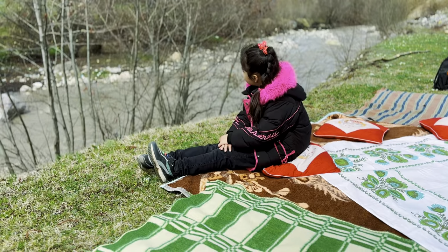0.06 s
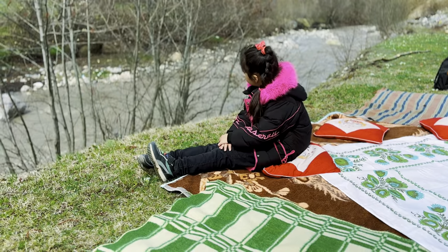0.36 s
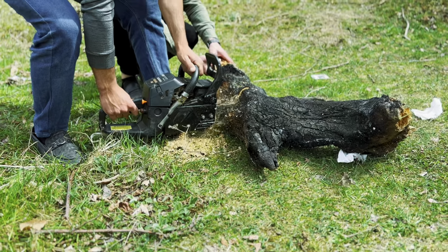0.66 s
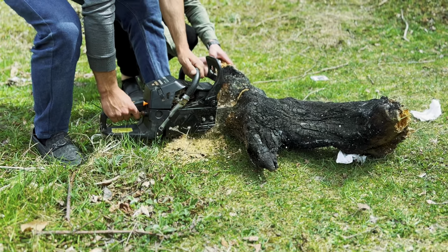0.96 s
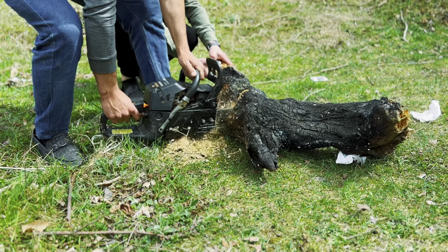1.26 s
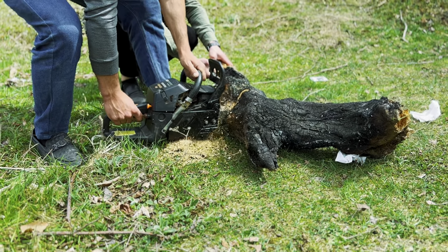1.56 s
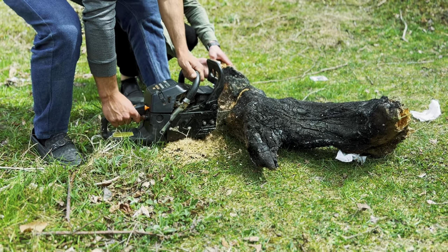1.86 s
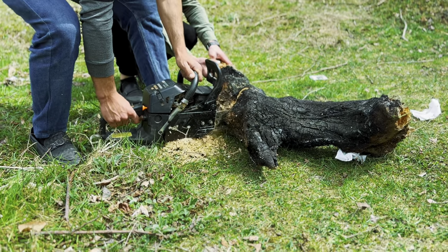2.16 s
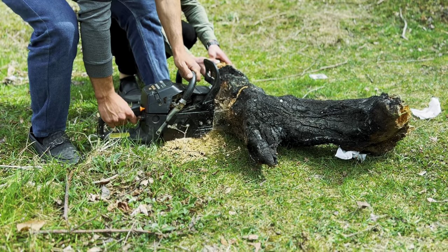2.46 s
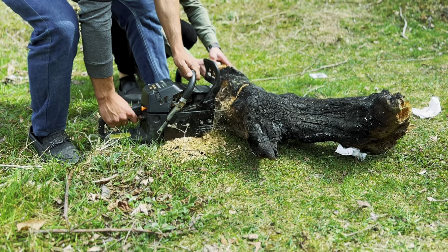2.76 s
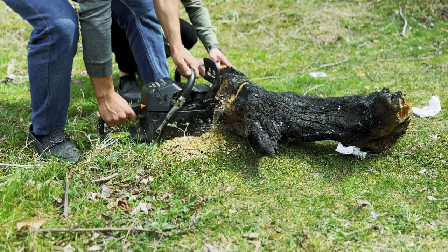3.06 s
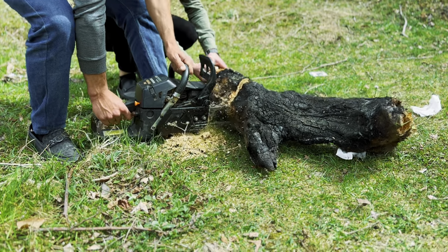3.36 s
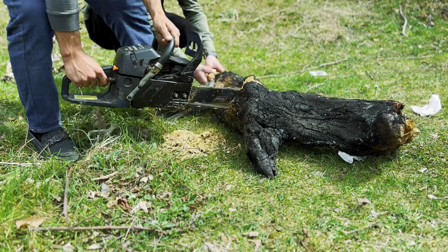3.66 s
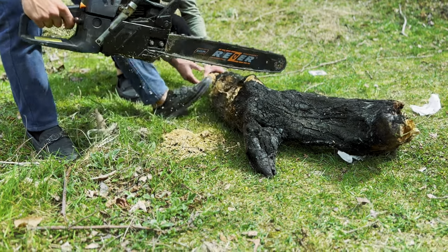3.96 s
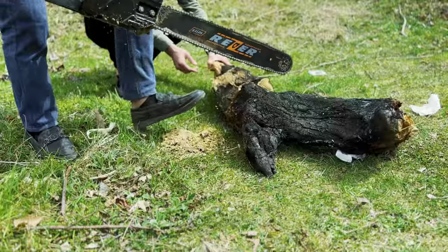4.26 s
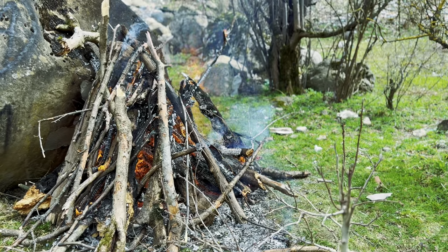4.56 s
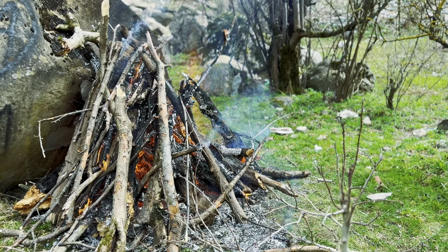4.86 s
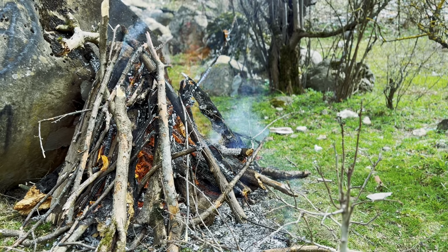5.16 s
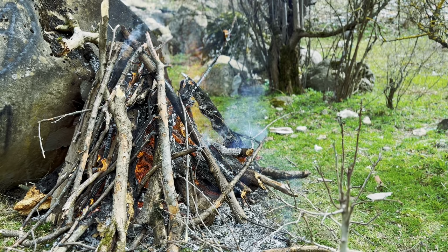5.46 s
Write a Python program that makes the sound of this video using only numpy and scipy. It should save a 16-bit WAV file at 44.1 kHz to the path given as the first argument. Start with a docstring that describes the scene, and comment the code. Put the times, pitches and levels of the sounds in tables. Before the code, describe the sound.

A two-stroke chainsaw revs in quick bursts and sinks to a putting idle, then an abrupt cut to a softly snapping wood fire.

```python
"""Wind buffets the microphone on a grassy river bank. At 0.5 s a two-stroke chainsaw cuts in at full
throttle: firings boom in the muffler and crack at its outlet. Six blips follow; between them the engine
pumps air, with a few stray pops, while the chain rattles on. From 3.2 s it sinks towards idle and putts.
At 4.3 s the scene changes abruptly to a wood fire in a breeze: sap pockets snap and sticks settle."""
import sys
import numpy as np
from scipy import signal
from scipy.fft import rfft, irfft, next_fast_len
from scipy.io import wavfile

SR = 44100
rng = np.random.default_rng(int(sys.argv[2]) if len(sys.argv) > 2 else 0)


def store_pcm(level_fs):
    """Save levels as 16-bit WAV."""
    pcm = np.round(np.clip(level_fs, -1, 1) * 32767).astype(np.int16)
    wavfile.write(sys.argv[1], SR, np.atleast_2d(pcm).T)


N = 251546
T = np.arange(N) / SR
SAW_START_S, SAW_END_S = 0.52, 4.342
IDLE_HZ, FINAL_HZ = 52.63, 60.35  # crank speed: sunk towards, reached at SAW_END_S

# Table levels are relative.
# Wind gusts. Each row: time in seconds, peak in dB, half length in seconds.
WIND_GUSTS = [(0, -21.5, 0.032), (0.174, -25, 0.014), (0.227, -20.5, 0.014), (0.301, -23, 0.023),
              (0.47, -12.5, 0.028), (0.513, -14.5, 0.0096), (1.18, -30, 0.17), (1.529, -29, 0.083),
              (2.9, -40, 0.29), (3.941, -38, 0.2), (5.063, -32, 0.043)]
# Wind and water spectra. Each row: frequency in Hz, level in dB.
BREEZE_SPECTRUM = [(20, -67), (45, -3.5), (85, 2), (150, -5), (250, -14.5), (450, -25), (1000, -52),
                   (3000, -87)]
EDDY_SPECTRUM = [(60, -1.5), (180, 1.5), (400, -4), (600, -10), (1000, -22.5), (2000, -36), (5000, -55)]
RIVER_SPECTRUM = [(530, -11.5), (900, -8.5), (1800, -12.5), (4000, -17), (8230, -19.5), (10100, -43),
                  (10800, -26), (12700, -17.5), (15000, -32)]

# Throttle bursts. Each row: opening and closing time in seconds, crank speed at each in Hz,
# surge above a steady climb in Hz, bark in dB, whistle in dB.
THROTTLE = [(0.522, 0.969, 130.8, 130.5, 2, 4, 8), (1.046, 1.378, 114.7, 133.3, 4, 7.5, 8),
            (1.501, 1.754, 87.07, 126.8, -4, 10, 2), (1.869, 2.14, 85.4, 134.5, 1.5, 9.5, 3.5),
            (2.266, 2.488, 90.8, 133.6, 5.5, 9.5, 1.5), (2.692, 2.871, 83.26, 137.5, 1, 9.5, 1.5),
            (3.086, 3.226, 85.37, 134.3, 5.5, 9, -1)]
# Brief changes of chain load. Each row: time in seconds, speed lift in Hz, half length in seconds.
LOAD_CHANGES = [(0.602, -1, 0.0368), (0.742, 2, 0.068), (0.892, 2.17, 0.023), (1.23, 1.7, 0.043)]
# Lone firings among misfires. Each row: time in seconds, strength in dB.
LONE_FIRINGS = [(0.978, 1), (1.003, 1), (1.028, -2.5), (1.479, -4), (1.860, -10.5), (2.254, -11),
                (2.497, 1.5), (2.644, -10.5), (2.68, -11), (2.880, -6), (3.068, -1.5)]
# Muffler boom and gas crack spectra. Each row: frequency in Hz, level in dB.
MUFFLER_SPECTRUM = [(20, -48), (45, -27), (85, 1.5), (125, 6), (175, -0.5), (265, -2), (400, 4), (540, 2.5),
                    (670, -24.5), (820, -8), (930, -8.5), (1060, -20.5), (1500, -23), (4000, -100)]
CRACK_SPECTRUM = [(400, 11), (1000, -2), (1700, 5), (2400, 6), (3100, -2), (3450, -8), (3900, 2),
                  (4400, 1.5), (5100, -9), (5750, -10), (6500, 5), (8500, 2), (10000, -13), (12000, 7),
                  (14500, -5), (16000, -11)]
# Resonances. Each row: frequency in Hz, width in Hz, level in dB.
OUTLET_MODES = [(713, 276, -7)]
HOUSING_MODES = [(2480, 150, 8.5), (3158, 48, 10.5), (3867, 54, 3.5), (4190, 58, -9.5), (4520, 53, -1.5),
                 (5020, 43, -24), (6610, 260, -4), (7670, 90, -2)]
SHELL_MODES = [(1086, 26, 12.5), (1161, 104, 8.5), (1308, 75, 12), (1648, 57, 14.5), (1697, 49, 6),
               (1974, 50, 7.5), (2266, 106, 9), (2840, 28, 7)]  # metal housing around the engine
SLOT_MODES = [(3777, 234, 0), (6850, 920, -3)]
CYLINDER_MODES = [(1700, 270, -21), (2580, 410, 14), (3250, 200, 6)]
# Housing clack, growing over the blips. Each row: time in seconds, level in dB.
CLACK_RISE = [(1.0, 1), (1.6, 2), (2.3, 5), (3.2, 9)]
# Cylinder knocks. Each row: time in seconds, level in dB.
FUEL_KNOCKS = [(0.524, -8), (1.48, -12), (1.872, -8), (2.266, -5), (2.692, -8), (3.067, -3), (3.089, -4)]
# Tones locked to the crank. Each row: multiple of crank speed, level in dB.
PUMP_ORDERS = [(1, -10), (2, -12), (3, -15), (4, 0), (5, -10), (6, -20), (7, -14), (8, -21), (9, -28),
               (10, -27), (12, -29)]  # air through the unfired engine
WHINE_ORDERS = [(12, 11), (13, 5.5), (15, 7.5), (17, 4.5), (18, 6.5), (20, 5.5), (23, 4), (27, -8),
                (29, 1.5), (30, -1.5), (33, -1.5), (35, -1)]  # fan, sprocket, chain links
# Spectra of chain and casing, and of an exhaust port puff. Each row: frequency in Hz, level in dB.
CASING_SPECTRUM = [(100, 1.5), (400, 14.5), (800, 7.5), (1200, -13.5), (1600, 1.5), (1850, -3), (2100, 3.5),
                   (2500, 4), (2950, 0.5), (3250, 1), (3650, -7.5), (4600, -5), (5500, -9), (6500, -4),
                   (8000, -4), (10000, -21.5), (12000, -1.5), (16000, -22)]
PUFF_SPECTRUM = [(50, -25), (170, -6), (260, -7), (340, -8), (480, 1), (720, -1), (850, -5), (1150, -8),
                 (1350, -21), (4000, -40)]
# Putts near idle. Each row: time in seconds, peak in dB, accompanying weak firing in dB.
IDLE_PUTTS = [(3.842, -27, -19), (3.869, -26, -23), (3.883, -26, -23), (3.897, -29, -24), (3.91, -24, -15),
              (3.941, -28, -24), (3.954, -29, -8.5), (4.012, -23, -13), (4.027, -28, -15),
              (4.042, -22, -18), (4.058, -26, -15), (4.087, -27, -15), (4.118, -28, -24), (4.135, -22, -16),
              (4.166, -28, -16), (4.197, -22, -10), (4.246, -23, -14), (4.278, -23.5, -10.5),
              (4.3117, -23, -11)]

# Fire spectra. Each row: frequency in Hz, level in dB.
HEARTH_SPECTRUM = [(100, -10.5), (500, 7), (1000, 0), (2500, -7.5), (4500, -14), (7000, -14.5),
                   (10000, -26.5), (13000, -13), (16000, -29)]
SNAP_SPECTRUM = [(300, -17), (1200, -3), (2700, -1.5), (5000, -2), (8000, 2), (10000, -10), (12500, 4.5),
                 (16000, -14)]
STICK_SPECTRUM = [(200, -6), (700, 10), (1400, 3), (2700, 0), (4000, -19), (16000, -30)]
# Bursting sap pockets. Each row: time in seconds, level in dB, decay in ms, ring in Hz.
SAP_SNAPS = [(4.594, -44, .6, 12000), (4.6183, -26.5, 0.39, 4460), (4.655, -43, .7, 6000),
             (4.8043, -36.5, 2.6, 6500), (4.894, -40.5, 1.2, 6500), (4.917, -50, .7, 12000),
             (5.069, -51, .7, 12000), (5.1575, -36, 1.7, 6400), (5.226, -44, .8, 8000),
             (5.2805, -40.5, 0.79, 8000), (5.4765, -49, 0.76, 7460), (5.5654, -15, 0.83, 7900)]
# Settling sticks. Each row: time in seconds, level in dB.
STICK_SETTLES = [(4.759, -34.5), (5.022, -43)]


def undb(db):
    """Decibels to gain."""
    return 10 ** (np.asarray(db) / 20)


def unit(x):
    """Scale to unit rms."""
    return x / np.sqrt(np.mean(x ** 2))


def between(start_s, end_s, fade_s):
    """Gate with linear ramps."""
    return np.clip((T - start_s) / fade_s, 0, 1) * np.clip((end_s - T) / fade_s, 0, 1)


def bell(at_s, half_s):
    """Gaussian envelope, 1/e at half_s from its peak."""
    return np.exp(-((T - at_s) / half_s) ** 2)


def ring(x, response):
    """Convolve with an impulse response."""
    return signal.oaconvolve(np.atleast_2d(x), np.atleast_2d(response), axes=-1)[:, :N]


def bin_gains(spectrum, size):
    """Gain per FFT bin from (Hz, dB) points."""
    hz, db = np.transpose(spectrum)
    return undb(np.interp(np.log(np.arange(size // 2 + 1) * SR / size + 1), np.log(hz), db))


def colour(x, spectrum, size=4096):
    """Minimum-phase filter of unit energy."""
    cepstrum = irfft(np.log(bin_gains(spectrum, size)))[:size // 2]
    cepstrum[1:] *= 2
    response = irfft(np.exp(rfft(cepstrum, size)))
    return ring(x, response / np.linalg.norm(response))


def noise(side_db):
    """Stereo white noise; side_db sets the width."""
    mid, side = rng.standard_normal((2, N))
    return unit(mid + undb(side_db) * np.array([side, -side]))


def walk(rate_hz):
    """Random drift, spread near one."""
    knots = rng.standard_normal(2048)
    return np.interp(T * rate_hz, np.arange(len(knots)), knots)


def clicks(times_s, sizes, half_taps=8):
    """Band-limited impulses at exact times."""
    at = np.asarray(times_s)[:, None] * SR
    taps = at.astype(int) + np.arange(1 - half_taps, half_taps + 1)
    shape = np.sinc(taps - at) * np.sinc((taps - at) / half_taps)
    return np.bincount(np.clip(taps, 0, N - 1).ravel(), (shape * sizes[:, None]).ravel(), N)


def decay(times_s, sizes, ms):
    """Envelope: a jump at each time, then exponential decay."""
    return signal.lfilter([1], [1, -np.exp(-1000 / (ms * SR))], clicks(times_s, sizes))


def strike(x, modes, wave=np.cos, polarity=1):
    """Damped modes of unit total energy; by default all start at their peak, as under a sharp blow."""
    age_s = T[:2048]
    response = 0
    for k, (hz, width_hz, db) in enumerate(modes):
        envelope = undb(db) * width_hz * np.exp(-np.pi * width_hz * age_s)
        response += polarity ** k * envelope * wave(2 * np.pi * hz * age_s)
    return ring(x, response / np.linalg.norm(response))


def resonate_twice(x, modes):
    """Two passes through damped sine modes of alternating sign."""
    once = strike(x, modes, np.sin, polarity=-1)
    return strike(once, modes, np.sin, polarity=-1)


def wind(on_bank, bank_db=-30, saw_db=-44, fire_db=-36.5, unrest_db=3.5):
    """Breeze and gusts rumble on the microphone; eddies roughen them on the open bank."""
    breeze = colour(noise(side_db=-15.5), BREEZE_SPECTRUM)
    eddies = colour(noise(side_db=-4), EDDY_SPECTRUM) * undb(4.1 * walk(62.1))
    steady_db = np.select([T < SAW_START_S, T < SAW_END_S], [bank_db, saw_db], fire_db)
    gust_power = sum((undb(db) * bell(s, half_s)) ** 2 for s, db, half_s in WIND_GUSTS)
    level = np.sqrt(undb(steady_db + unrest_db * walk(8.7)) ** 2 + gust_power)
    return level * (breeze * (1 - 0.39 * on_bank) + eddies * on_bank)


def river(on_bank, by_saw_db=-45, bank_lift_db=1.5):
    """Steady hiss of water, fainter by the saw."""
    hiss = colour(noise(side_db=-3.5), RIVER_SPECTRUM)
    return undb(by_saw_db + bank_lift_db * on_bank) * hiss * between(-1, SAW_END_S, 0.0016)


def crank_speed_hz(clutch_hz=106.4, pickup_s=0.03):
    """Free pickup until the clutch drags the chain, a climb under load, then a fall towards idle."""
    hz = np.full(N, float(THROTTLE[0][2]))
    following = [(start, low) for start, _, low, *_ in THROTTLE[1:]] + [(SAW_END_S, FINAL_HZ)]
    for (start_s, end_s, low_hz, top_hz, surge_hz, *_), (next_s, next_hz) in zip(THROTTLE, following):
        engaged_hz = max(low_hz, clutch_hz)
        up = np.clip((T - start_s) / (end_s - start_s), 0, 1)
        down = np.clip((T - end_s) / (next_s - end_s), 0, 1)
        lag_hz = (engaged_hz - low_hz) * np.exp(-np.maximum(T - start_s, 0) / pickup_s)
        climb_hz = engaged_hz + (top_hz - engaged_hz) * up + surge_hz * (1 - (2 * up - 1) ** 2) - lag_hz
        fall_hz = IDLE_HZ + (top_hz - IDLE_HZ) * ((next_hz - IDLE_HZ) / (top_hz - IDLE_HZ)) ** down
        hz = np.select([T < start_s, T < end_s], [hz, climb_hz], fall_hz)
    return hz + sum(lift_hz * bell(s, half_s) for s, lift_hz, half_s in LOAD_CHANGES)


def crank_turns(hz, hunting=0.00245):
    """Turn count: hunts under changing load, lurches near idle so each putt lands on a whole turn."""
    turns = np.cumsum(hz * (1 + 0.0012 * walk(40) + hunting * walk(11))) / SR
    release_s = THROTTLE[-1][1]
    putts_s = [s for s, *_ in IDLE_PUTTS]
    lurch = np.unwrap(np.append(0, -np.interp(putts_s, T, turns) % 1), period=1)
    return turns + np.interp(T, [release_s] + putts_s, lurch)


def firings(hz, turns):
    """Lone pops, plus one firing a turn under throttle: seconds and boom, bark, crack, whistle in dB."""
    s, db = np.transpose(LONE_FIRINGS)
    rows = [np.column_stack([s, db + 2, 0.42 * db + 5, db + 1, db - 5])]
    for start_s, end_s, *_, bark_db, whistle_db in THROTTLE:
        first_turn, last_turn = np.interp([start_s, end_s], T, turns)
        s = np.interp(np.arange(first_turn, last_turn), turns, T)
        opening_db = -4 * np.exp((start_s - s) / 0.0021)
        shutting_db = -5 * np.exp((s - end_s) / 0.024)
        octaves_slow = np.log2(hz.max() / np.interp(s, T, hz))
        boom_db = -0.2 + opening_db + shutting_db - 2 * octaves_slow
        crack_db = -2.7 - np.exp((start_s - s) / 0.0016) + shutting_db
        rows.append(np.column_stack([s, boom_db, bark_db - 3.5 * octaves_slow, crack_db,
                                     whistle_db + shutting_db]))
    return np.vstack(rows).T


def muffler_boom(pushes, top_hz=838.6, delay_s=0.006246):
    """Lows are delayed more than highs, so each push becomes a falling boom."""
    size = next_fast_len(N + 4096)
    hz = np.minimum(np.arange(size // 2 + 1) * SR / size, top_hz)
    gain = unit(bin_gains(MUFFLER_SPECTRUM, size))
    sweep = 1j * np.exp(-2j * np.pi * delay_s * (hz - hz * hz / (2 * top_hz)))
    return irfft(rfft(pushes, size) * gain * sweep, size)[:N]


def housing_rasp(times_s, force, ring_s=0.0031, rise_s=0.00024, size=1024):
    """Each crack takes the same short paths through the housing: treble buzz at engine pitch."""
    paths = noise(side_db=-12)[:, :size] * np.exp(-T[:size] / ring_s) * (1 - np.exp(-T[:size] / rise_s))
    return colour(ring(clicks(times_s, force), paths), CRACK_SPECTRUM)


def exhaust(hz, turns, growl_db=3, transfer_turns=0.098, transfer_share=0.54):
    """Each firing cracks, rings the metal, whistles and booms; slow firings come unevenly and growl."""
    s, boom_db, bark_db, crack_db, whistle_db = firings(hz, turns)
    time_dev, push_dev, shell_dev, crack_dev, whistle_dev = rng.standard_normal((1024, 5))[:len(s)].T
    speed_hz = np.interp(s, T, hz)
    labour = np.clip(1 - speed_hz / hz.max(), 0, 0.4)
    s = s + (8e-6 + 0.001 * labour ** 2) * time_dev
    uneven_db = (growl_db * labour - 0.5) * push_dev

    def pushes(db):
        """The exhaust port opens; the transfer ports follow with a weaker push."""
        size = undb(db + uneven_db)
        return clicks(s, size) + transfer_share * clicks(s + transfer_turns / speed_hz, size)

    boom = muffler_boom(pushes(boom_db))
    bark = resonate_twice(pushes(bark_db), OUTLET_MODES)
    clack_gain = undb(np.interp(T, *np.transpose(CLACK_RISE)))
    clack = clack_gain * strike(clicks(s, undb(crack_db + 1.3 * crack_dev)), HOUSING_MODES)
    shell = strike(clicks(s, undb(crack_db + 2.3 * shell_dev)), SHELL_MODES)
    force, blow = undb(np.array([crack_db, whistle_db]) + 1.44 * crack_dev)
    jet = decay(s, force, ms=1) - decay(s, force, ms=0.31) + undb(-3) * decay(s, force, ms=6.9)
    crack = colour(noise(side_db=-38) * jet, CRACK_SPECTRUM)
    breath = clicks(s + 12e-6 * whistle_dev, blow)
    breath = breath + undb(-25) * noise(side_db=-6) * decay(s, blow, ms=0.7)
    whistle = resonate_twice(breath, SLOT_MODES)
    metal = undb(-4.5) * shell + undb(-13) * clack
    gas = undb(-23) * whistle + undb(-25) * crack + undb(-25.5) * housing_rasp(s, force)
    return undb(10.5) * boom + undb(-19) * bark + metal + gas


def knocking():
    """Fuel gathered while coasting lights and knocks on the cylinder."""
    s, db = np.transpose(FUEL_KNOCKS)
    return strike(clicks(s, undb(db)), CYLINDER_MODES)


def crank_tones(turns, orders, waver_db, slack_cycles=0):
    """Tones at multiples of crank speed, wavering in level and, with slack, in phase."""
    tones = 0
    for k, db in orders:
        level = undb(db + waver_db * walk(35))
        tones += level * np.sin(2 * np.pi * (k * turns + slack_cycles * walk(110)) + k * k)
    return unit(tones)


def chain_rattle(turns, turn_pulse, slowness, slap_count=1100, dull_hz=2800):
    """Slack links slap the bar at random: denser at speed, duller when slow."""
    hiss = noise(side_db=-40)
    place, softness = rng.random((slap_count, 2)).T
    slaps_s = np.interp(place * turns[-1], turns, T)
    slaps = 0.25 + decay(slaps_s, undb(-15 * softness), ms=2)
    bright = unit(colour(hiss * slaps * (1 + 0.52 * turn_pulse), CASING_SPECTRUM))
    dull = signal.sosfilt(signal.butter(2, dull_hz, fs=SR, output="sos"), bright)
    return bright + slowness * (dull - bright)


def cylinder_swoop(hz, turns, base_hz=216, swing_hz=752, crest_turns=0.108, dip=0.79, waver_db=7):
    """Cylinder air rings once a turn; its pitch shoots up and falls back as the piston squeezes it."""
    offset_turns = (turns + 0.5) % 1 - 0.5
    from_crest = offset_turns / crest_turns
    cycles = (base_hz * offset_turns + swing_hz * crest_turns * np.arctan(from_crest)) / hz
    swell = np.sqrt(np.abs(np.cos(np.pi * offset_turns))) * (1 - dip / (1 + from_crest ** 2))
    return unit(np.cos(2 * np.pi * cycles) * swell * undb(waver_db * walk(70)))


def chain_and_pumping(hz, turns, loping_hz=118, chain_db_per_octave=6):
    """Chain and casing whine and rattle; throttle shut, the piston pumps a tone, then separate puffs."""
    slowness = np.clip((loping_hz - hz) / (loping_hz - FINAL_HZ), 0, 1)
    shut = 1 - sum(between(start_s, end_s + 0.017, 0.027) for start_s, end_s, *_ in THROTTLE)

    def gain(fast_db, slow_db, bend=1):
        return undb(fast_db + (slow_db - fast_db) * slowness ** bend)

    pump = crank_tones(turns, PUMP_ORDERS, waver_db=0.9)
    whine = crank_tones(turns, WHINE_ORDERS, waver_db=4, slack_cycles=0.3)
    whine = unit(colour(whine, CASING_SPECTRUM))
    turns_s = np.interp(np.arange(1, turns[-1]), turns, T)
    sizes = undb(1.2 * rng.standard_normal(1024)[:len(turns_s)])
    puffs = unit(colour(clicks(turns_s, sizes), PUFF_SPECTRUM))
    rattle = chain_rattle(turns, decay(turns_s, sizes, ms=1), slowness)
    taut_gain = undb(-5 * (1 - shut))
    chain = gain(-31, -30) * taut_gain * rattle + gain(-34, -36) * whine
    swoop = cylinder_swoop(hz, turns)
    air = gain(-24, -35.5, bend=3) * pump + gain(-55, -37.5) * puffs + gain(-70, -32) * swoop
    return shut * air + undb(chain_db_per_octave * np.log2(hz / hz.max())) * chain


def idling(hz, putt_order=11.5, fall_hz_per_s=120000, half_s=0.0013, lead_s=0.00041):
    """Each putt is a falling pulse from the outlet; fuel catching adds a small crack, ring and boom."""
    putts = 0
    for s, db, _ in IDLE_PUTTS:
        cycles = (putt_order * hz - fall_hz_per_s * (T - s) / 2) * (T - s)
        putts += undb(db) * bell(s, half_s) * np.cos(2 * np.pi * cycles)
    s, _, firing_db = np.transpose(IDLE_PUTTS)
    force = undb(firing_db)
    boom = muffler_boom(clicks(s - lead_s, force))
    crack = colour(noise(side_db=-20) * decay(s - lead_s, force, ms=3.7), CRACK_SPECTRUM)
    shell = strike(clicks(s, force), SHELL_MODES)
    return putts + undb(-6) * shell + undb(5) * boom + undb(-23) * crack


def chainsaw(scatter_db=-21, scatter_s=0.04, left_db=-1.46, right_lag_samples=1):
    """The whole saw, with faint scatter off ground, log and trees; it reaches the left side first."""
    hz = crank_speed_hz()
    turns = crank_turns(hz)
    direct = exhaust(hz, turns) + knocking() + chain_and_pumping(hz, turns) + idling(hz)
    age_s = T[:8192]
    echoes = rng.standard_normal((2, len(age_s))) * np.exp(-age_s / scatter_s)
    near = direct + undb(scatter_db) * ring(direct, echoes / np.linalg.norm(echoes[0]))
    taps = np.arange(16) - 6
    arrivals = np.array([undb(left_db) * np.sinc(taps), np.sinc(taps - right_lag_samples)])
    return ring(near, arrivals) * between(SAW_START_S, SAW_END_S, 0.00065)


def fire_hiss(level_db=-49):
    """The hearth hisses, barely wavering."""
    hiss = colour(noise(side_db=0.5), HEARTH_SPECTRUM)
    return undb(level_db + 0.4 * walk(23)) * hiss * between(SAW_END_S - 0.01, T[-1] + 1, 0.0016)


def sap_snaps(tick_count=14, tick_db=-50, ring_s=0.00041, tail_db=-27):
    """Pockets of sap burst and ring briefly among faint ticks."""
    place, softness = rng.random((tick_count, 2)).T
    ticks_s = SAW_END_S + place * (T[-1] - SAW_END_S)
    envelope = decay(ticks_s, undb(tick_db - 10 * softness), ms=0.96)
    pockets = 0
    for s, db, ms, hz in SAP_SNAPS:
        envelope += decay([s], undb([db]), ms) + decay([s], undb([db + tail_db]), ms=16)
        age_s = np.maximum(T - s, 0)
        pockets += undb(db - 1) * np.exp(-age_s / ring_s) * np.sin(2 * np.pi * hz * age_s)
    return colour(undb(3.5) * noise(side_db=-1) * envelope, SNAP_SPECTRUM) + pockets


def settling_sticks():
    """Sticks settle with a short rustle."""
    s, db = np.transpose(STICK_SETTLES)
    return colour(noise(side_db=4) * decay(s, undb(db), ms=17), STICK_SPECTRUM)


def scene():
    """Wind throughout; river and saw, then the fire."""
    saw = chainsaw()
    on_bank = between(-1, SAW_START_S + 0.04, 0.012)
    return wind(on_bank) + river(on_bank) + saw + fire_hiss() + sap_snaps() + settling_sticks()


def record(dry, ceiling=0.34, low_cut_hz=24, high_cut_hz=16000):
    """The microphone rounds the loudest peaks; filters cut the deepest rumble and the top."""
    rounded = ceiling * np.tanh(dry / ceiling)
    low_cut = signal.butter(2, low_cut_hz, "highpass", fs=SR, output="sos")
    high_cut = signal.ellip(8, 0.2, 70, high_cut_hz, fs=SR, output="sos")
    return signal.sosfilt(high_cut, signal.sosfilt(low_cut, rounded))


dry = scene()
out = record(dry)
store_pcm(out)
```